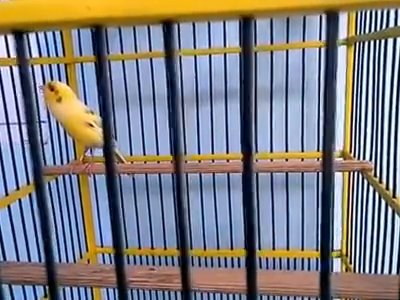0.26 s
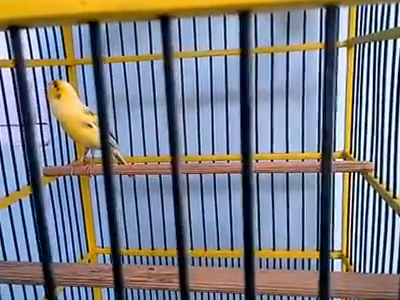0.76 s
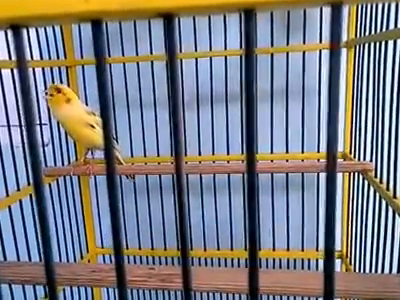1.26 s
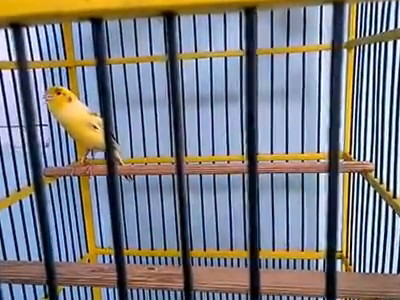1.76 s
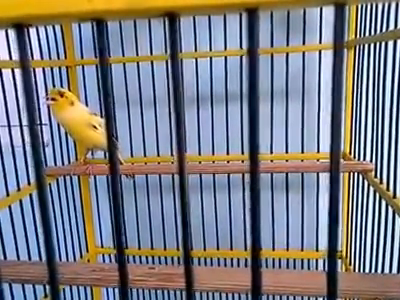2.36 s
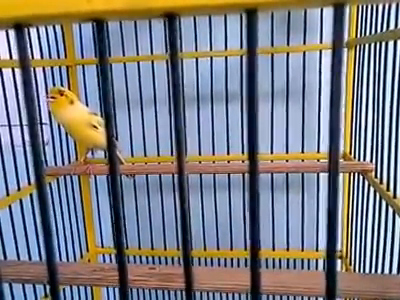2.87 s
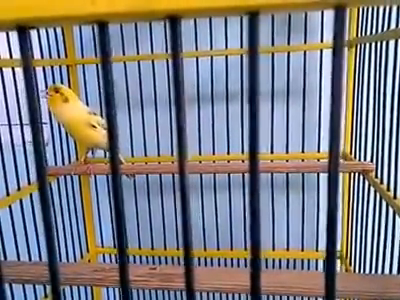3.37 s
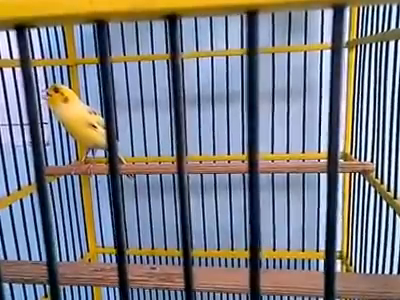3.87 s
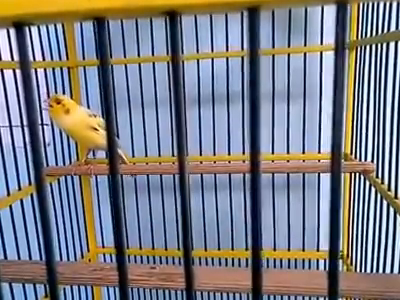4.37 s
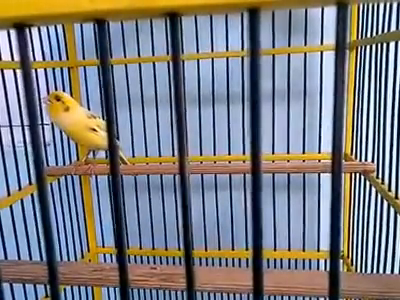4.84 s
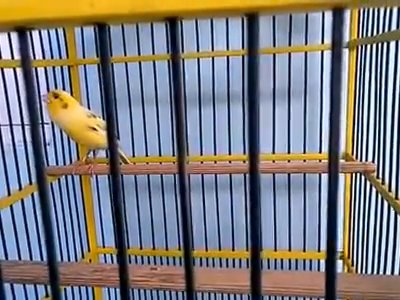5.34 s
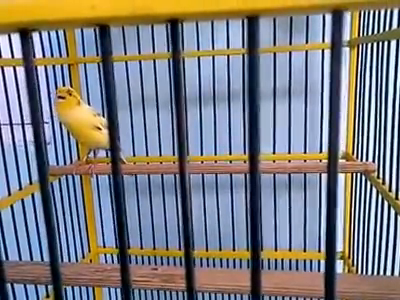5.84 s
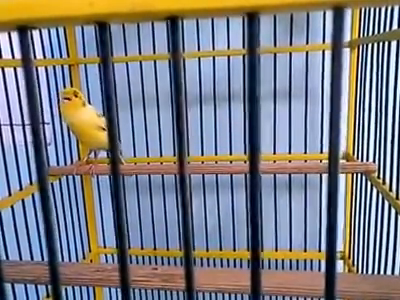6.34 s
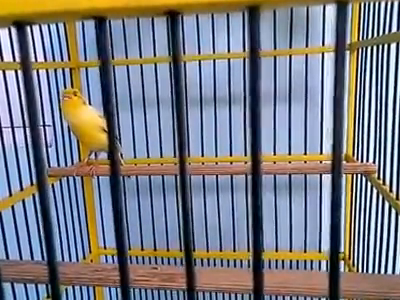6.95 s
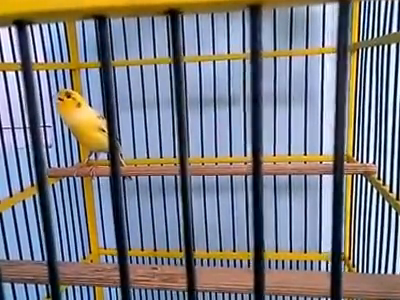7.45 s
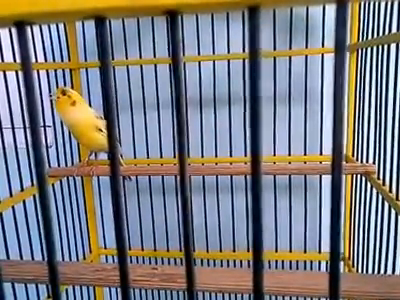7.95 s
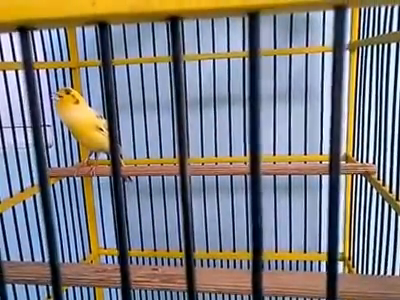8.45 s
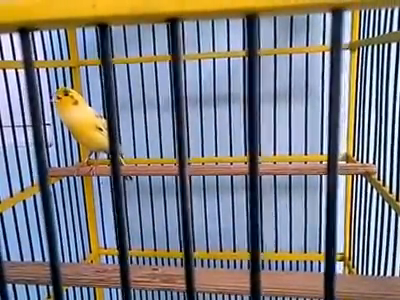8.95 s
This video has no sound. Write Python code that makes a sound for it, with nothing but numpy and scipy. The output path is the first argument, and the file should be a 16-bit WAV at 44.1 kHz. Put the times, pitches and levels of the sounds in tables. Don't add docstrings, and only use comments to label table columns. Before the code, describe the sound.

Bright, piercing canary song in rapid changing phrases rings off a nearby wall, with a fainter second bird and soft street wash behind.

```python
import sys
import numpy as np
from scipy import signal
from scipy.fft import rfft, irfft, next_fast_len
from scipy.io import wavfile
from scipy.ndimage import uniform_filter1d, minimum_filter1d

SR = 44100
rng = np.random.default_rng(int(sys.argv[2]) if len(sys.argv) > 2 else 0)


def unload_audio(sound):
    columns = np.transpose(np.atleast_2d(sound))
    steps = np.round(np.clip(columns, -1, 1) * 32767)
    wavfile.write(sys.argv[1], SR, steps.astype(np.int16))


def to_linear_factor(level_db):
    exponent = np.asarray(level_db, float) / 20
    return 10 ** exponent


N = 406161
LEAD = SR // 4
BEAK_HZ = 5000

# frequency in Hz, density in dB per Hz.
WASH_COLOUR = [(71, -33.5), (120, -7.5), (204, -15), (289, -8.5), (515, -12.5), (1160, -15.5), (1900, -12),
               (2470, -14), (3600, -9.5), (5300, -33), (8000, -38.5)]
# centre in seconds, width in
# seconds, flatness of the top, lift of the wash in dB, lift of the rumble in dB.
GUSTS = [
    (-.05, 0.3, 1.13, 7, -1.5),
    (2.951, 0.44, 0.35, -1.5, 5),
    (4.02, 0.37, 5.6, 7, -12.5),
    (6.08, 0.11, 2.6, -0.5, -2),
    (6.416, 0.019, 0.39, 12.5, 5.5),
    (9, 0.076, 0.83, 8.5, 12),
    (9.08, 0.2, 1.7, 8.5, -1),
]
# start in seconds, length in seconds, from Hz, to Hz, level in dB.
HOOTS = [
    (4.47, 0.039, 459, 482, -48.5),
    (4.6, 0.091, 478, 455, -49.5),
    (4.66, 0.08, 699, 711, -50.5),
    (4.73, 0.056, 1058, 1044, -47.5),
    (4.79, 0.14, 1722, 1610, -45),
    (6.7, 0.44, 1650, 1420, -52.5),
    (6.98, 0.24, 764, 656, -54),
    (7.3, 0.061, 514, 533, -50),
    (7.5, 0.065, 473, 523, -46.5),
    (7.76, 0.09, 314, 315, -49),
]
# start in seconds, length in seconds, level in dB.
FAR_UPSWEEPS = [(1.678, 0.051, -38.5), (1.839, 0.035, -42), (1.952, 0.047, -42), (2.084, 0.045, -44),
                (2.159, 0.047, -39), (2.336, 0.041, -40), (2.433, 0.025, -38), (2.579, 0.1, -42),
                (2.703, 0.022, -34), (2.946, 0.024, -35), (3.036, 0.021, -36.5), (3.14, 0.044, -38.5),
                (3.233, 0.056, -35.5), (3.561, 0.075, -38), (3.856, 0.11, -36)]
# start in seconds, length in seconds, level in dB.
FAR_DOWNSWEEPS = [
    (-.05, 0.087, -38.5),
    (4.35, 0.082, -32.5),
    (4.63, 0.091, -32),
    (4.936, .1, -30.5),
    (5.251, 0.11, -29.5),
    (7.839, 0.062, -29.5),
    (8.015, 0.056, -32),
    (8.616, 0.015, -25),
]
# start in seconds, length in
# seconds, from Hz, to Hz, level in dB.
FAR_HELD = [(0.13, 0.052, 3720, 3590, -23.5), (0.297, 0.033, 3610, 3590, -26.5),
            (0.45, 0.041, 3670, 3700, -25), (0.596, 0.065, 3605, 3650, -31.5),
            (0.74, 0.045, 6690, 5730, -27.5), (0.861, 0.033, 6890, 6100, -28.5),
            (4.416, 0.041, 2430, 2403, -39.5), (4.72, 0.07, 2163, 2200, -44),
            (5.03, 0.05, 2140, 2118, -41.5), (5.348, 0.038, 2147, 2170, -43.5),
            (2.12, 0.19, 3690, 3570, -37.5), (2.327, .11, 3490, 3670, -33.5),
            (3.307, 0.027, 3500, 4095, -30.5), (3.727, 0.11, 3825, 3860, -33.5),
            (3.739, 0.092, 5130, 5280, -13), (3.995, 0.13, 3720, 4230, -24.5),
            (2.264, 0.016, 4405, 3710, -38), (3.24, 0.036, 5180, 5100, -13), (4.574, 0.14, 7270, 6310, -30),
            (5.096, 0.4, 3380, 3184, -48.5), (5.46, 0.084, 5660, 5460, -28.5),
            (5.397, 0.091, 6840, 6620, -43.5), (5.463, 0.068, 5010, 4080, -31.5)]

# seconds from its anchor, pitch in Hz, level in dB.
ROLL = [(-.095, 7180, -28.5), (-.085, 6522, -3.5), (-.035, 4450, -5), (-.016, 3670, 0), (0, 3080, 0),
        (.012, 2650, -8), (.017, 2220, -0.5), (.0198, 2200, -2.5), (.025, 993, -32)]
# seconds from its anchor, pitch in Hz, level in dB.
LOW_ROLL = [(-.088, 6636, -10.5), (-.08, 6030, -11), (-.035, 4440, -4.5), (-.016, 3690, -1), (0, 3114, 0.3),
            (.012, 2520, -12), (.017, 2350, -11), (.0198, 2253, -2.5), (.025, 890, -35.5)]
# seconds from its anchor, pitch in Hz, level in dB.
SLIDE = [(-.21, 7384, -43), (-.13, 6964, -1.5), (-.085, 5976, 6.5), (-.05, 5030, -1.5), (-.03, 4400, 6),
         (-.014, 3680, 5), (0, 3000, 6), (.007, 2757, -4), (.012, 2610, -21.5)]
# seconds from its anchor, pitch in Hz, level in dB.
RISE = [(-.016, 1990, -40.5), (-.006, 2766, -1.5), (.004, 3125, 10.5), (.016, 3608, -26.5), (.03, 3710, 4),
        (.08, 4630, 3), (.12, 4900, -9), (.17, 5105, 6.5), (.22, 5330, -29.5)]
# seconds from its anchor, pitch in Hz, level in dB.
HOLD = [(-.11, 7113, -28.5), (-.085, 6500, -6.5), (-.055, 4650, -11), (-.02, 3857, -7), (0, 3528, -4.5),
        (.02, 3424, -7), (.068, 3360, -5.5), (.078, 3300, -13.5), (.09, 3490, -35.5)]
# seconds from its anchor, pitch in Hz, level in dB.
FALL = [(-.105, 7530, -37), (-.075, 6460, -1.5), (-.055, 4483, -17), (-.008, 3606, -5), (0.024, 3377, -6.5),
        (.06, 3050, -7), (.1, 2680, -15), (.14, 2300, -25), (.2, 2270, -27)]
# seconds from its anchor, pitch in Hz, level in dB.
TRILL = [(-.055, 6684, -5.5), (-.045, 5800, -7.5), (-.03, 4700, -3), (-.013, 3717, -9), (-.006, 3395, -1),
         (0, 2914, -5), (.004, 2600, -1.5), (.008, 1796, -17.5), (.012, 1040, -31.5)]
# seconds from its anchor, pitch in Hz, level in dB.
CHIP = [(-.06, 6260, -12.5), (-.05, 6000, -21.5), (-.035, 4660, -18), (-.014, 3670, -10), (-.006, 3386, -1),
        (0, 2971, -6.5), (.004, 2580, -11.5), (.007, 2080, -21), (.011, 1380, -54)]

# anchor in seconds, effort in dB, stretch before the anchor, stretch after it,
# extra dB on the high part. The phrases below share these columns.
FIRST_ROLLS = [(-0.04, -8.5, 0.58, 0.56, 0.5), (0.115, -10, 1.03, 0.94, 2), (0.272, -9.5, 1, 0.82, 0.6),
               (0.422, -10, 0.97, 1, 0.7), (0.576, -10.5, 0.73, 0.71, 1.5), (0.711, -10, 0.87, 0.59, -1.2),
               (0.838, -9.5, 0.66, 0.52, 0.5), (0.956, -11.5, 0.51, 0.77, -0.5),
               (1.093, -10.5, 0.83, 0.59, 0.5), (1.221, -11, 0.75, 0.52, 3.5),
               (1.345, -10, 0.63, 0.56, 2.3), (1.473, -10.5, 0.76, 0.65, 1.2)]
# anchor in seconds, effort in dB, stretch before, stretch after, extra high dB.
SLIDES = [
    (1.606, -16.5, 0.71, 0.12, -2.5),
    (1.811, -14, 0.9, 0.28, -0.7),
    (2.033, -14, 0.85, 0.65, -1.9),
    (2.28, -13.5, 0.9, 0.5, 0.6),
    (2.537, -14.5, 1.01, 0.42, -1.4),
    (2.795, -14, 1.03, 0.29, -2),
    (5.647, -14.5, 0.55, 0.5, -2.5),
]
# anchor in seconds, effort in dB, stretch before, stretch after, extra high dB.
RISES = [
    (2.844, -21.5, 1, 0.77, 1),
    (3.067, -17.5, 0.86, 0.91, -2.1),
    (3.346, -17, 0.65, .93, -0.8),
    (3.611, -16.5, 1, .89, -3),
]
# anchor in seconds, effort in dB, stretch before, stretch after, extra high dB.
HOLDS = [
    (3.993, -3.5, 0.98, 0.71, 0.5),
    (4.236, 0.5, .94, 1.03, -2),
    (4.494, -1, 0.97, 1.01, 0.3),
    (4.76, -0.5, 1.1, 1.68, -1.5),
    (5.055, -0.5, 1.05, 0.64, -4),
]
# anchor in seconds, effort in dB, stretch before, stretch after, extra high dB.
LAST_HOLD = [
    (5.303, -2, 1.04, 1, -1),
]
# anchor in seconds, effort in dB, stretch before, stretch after, extra high dB.
TRILLS = [
    (5.747, -12, 0.81, 1.3, -2.2),
    (5.842, -10.5, 0.95, 1, -1.5),
    (5.941, -8.5, 0.95, 0.78, 0.5),
    (6.036, -9.5, 0.93, 1.1, -1.5),
    (6.133, -7.5, 0.83, 0.84, -1.7),
    (6.225, -8, 0.97, 1, -0.1),
    (6.32, -8, 0.95, 0.62, -2.5),
    (6.416, -10, 1.29, 0.87, -0.5),
    (6.507, -7, 0.8, 0.97, -2.4),
    (6.603, -5.5, 0.44, 0.49, -2.3),
]
# anchor in seconds, effort in dB, stretch before, stretch after, extra high dB.
CHIPS = [
    (6.696, -1, 0.51, 0.75, 6.5),
    (6.787, -1, 0.69, 0.83, 1.5),
    (6.879, -3, 0.73, 0.97, 3.3),
    (6.969, -0.5, 0.65, 0.5, -2),
    (7.057, -2, 0.53, 0.77, 1),
    (7.144, -2.5, 0.63, 0.91, 3.2),
    (7.237, -2, 0.93, 0.41, -6.5),
    (7.327, -1.5, 0.82, 0.37, 2.8),
    (7.414, -1, 0.65, 0.34, 2),
    (7.505, -2, 0.8, 0.44, 1),
]
# anchor in seconds, effort in dB, stretch before, stretch after, extra high dB.
LAST_ROLLS = [(7.633, -7, 1.02, 0.98, -1.3), (7.785, -6.5, 1.03, 0.96, 0.6), (7.94, -6.5, 0.85, 1.04, -0.7),
              (8.094, -6.5, 1.15, 0.91, -0.1), (8.254, -7, 1.11, 1.0, 0.7), (8.409, -5.5, 1.1, 1.0, -1.1),
              (8.571, -6, 1.14, 0.98, -1.3), (8.728, -6, 1.03, 1, 0.3), (8.883, -8, 1.1, 1.01, -2.7),
              (9.035, -6, 0.95, 0.77, -2.4), (9.171, -7.5, 0.86, 0.55, -2.5)]
# time in seconds, extra dB on the highest notes.
BEAK = [(0, -6), (.6, 0), (1, 0.5), (1.5, 1.5), (2, -3.5), (2.5, 0.2), (3.1, 4), (3.6, 19), (4, 0.5),
        (4.6, -3.5), (5.3, -3.5), (5.65, 1), (6.3, 4.5), (7, 9), (7.6, 3.5), (8, 1), (8.4, 4.5),
        (9.2, 12.5)]

# delay in seconds, share of the direct sound.
WALLS = [(.0031, -0.16), (.0072, -0.26)]
# frequency in Hz, early decay time in seconds, level in dB.
ROOM = [(1500, .12, -2.5), (2200, 0.14, 0), (2880, 0.16, 4), (3500, 0.11, 1.1), (4500, 0.18, -4),
        (4950, 0.13, -4), (5360, 0.081, -2.5), (7000, .09, -8.5)]

# time in seconds, overshoot in dB.
OVERLOADS = [
    (2.4946, 0.5),
    (2.7782, 1.1),
    (4.2373, 1),
    (4.4938, 0.65),
    (6.4189, 1),
    (6.6053, 0.16),
    (6.7874, 1.9),
    (7.3244, -0.5),
    (7.6195, 0.36),
    (7.9373, 0.5),
]
BAND_EDGES_HZ = [3750, 4000, 4250, 4500, 4875, 5250, 5625, 6000, 6500, 7000, 7500]
BAND_DB = [-0.5, 1.5, 1, 0.43, -6.5, -6.5, -3, -9.5, -15.5, -5.5]
EARLY_TILES = [0.026, 0.086, 0.134, 0.178, 0.238, 0.354, 0.39, 0.482, 0.534, 0.594, 0.634, 0.686, 0.734,
               0.786, 0.862, 0.914, 0.966, 1.01, 1.058, 1.098, 1.138, 1.274, 1.326, 1.394, 1.49, 1.53,
               1.582, 1.682, 1.77, 1.79, 1.87, 2.122, 2.194, 2.262, 2.326, 2.386, 2.49, 2.634, 2.706, 2.858,
               2.91, 2.97, 3.03, 3.158, 3.234, 3.286, 3.334, 3.478, 3.542, 3.618, 3.654, 3.734, 3.798,
               3.862, 3.906, 3.942, 3.994]
LATE_TILES = [4.114, 4.166, 4.198, 4.29, 4.414, 4.43, 4.462, 4.51, 4.554, 4.65, 4.682, 4.718, 4.766, 4.886,
              4.97, 5.002, 5.038, 5.07, 5.142, 5.282, 5.318, 5.398, 5.458, 5.602, 5.702, 5.794, 5.89, 5.926,
              6.17, 6.242, 6.342, 6.958, 6.986, 7.062, 7.126, 7.186, 7.306, 7.522, 7.606, 7.758, 7.838,
              8.006, 8.062, 8.162, 8.214, 8.27, 8.314, 8.474, 8.542, 8.658, 8.694, 8.786, 8.854, 8.902,
              8.946, 8.998, 9.038]
EARLY_WIDE = [0.002, 0.286, 0.302, 0.338, 0.426, 1.19, 1.234, 1.366, 1.442, 1.63, 1.822, 1.938, 2.03, 2.078,
              2.45, 2.51, 2.542, 2.586, 2.762, 2.782, 2.81, 3.09, 3.378, 3.602, 3.89, 4.146, 4.246, 4.358,
              4.386, 4.666, 4.81, 4.954, 5.202, 5.218, 5.254, 5.522, 5.586, 5.638, 5.67]
LATE_WIDE = [5.75, 5.85, 5.954, 5.986, 6.042, 6.074, 6.09, 6.126, 6.214, 6.29, 6.43, 6.45, 6.466, 6.506,
             6.546, 6.59, 6.606, 6.654, 6.706, 6.746, 6.794, 6.834, 6.894, 6.938, 7.422, 7.458, 7.586,
             7.654, 7.698, 7.738, 7.79, 7.886, 7.958, 8.114, 8.134, 8.362, 8.43, 8.59, 8.642, 8.742, 9.082,
             9.134, 9.186]


def evened(x):
    return x / np.sqrt(np.mean(x ** 2) + 1e-20)


def gusts():
    t = np.arange(0, N, 64) / SR
    lift = 0
    for s, width, flatness, *db in GUSTS:
        swell = np.exp(-abs((t - s) / width) ** (2 * flatness))
        lift = lift + np.outer(db, swell)
    return np.repeat(lift, 64, axis=1)[:, :N]


def rumble():
    band = signal.butter(2, [45, 160], "band", fs=SR, output="sos")
    lumps = evened(uniform_filter1d(rng.standard_normal(N), size=3000))
    air = evened(signal.sosfilt(band, rng.standard_normal(N)) * to_linear_factor(4 * lumps))
    return to_linear_factor(-62 + gusts()[1]) * air


def street():
    hz, db = np.transpose(WASH_COLOUR)
    log_hz = np.log(np.fft.rfftfreq(N, 1 / SR) + 1)
    colour = to_linear_factor(np.interp(log_hz, np.log(hz), db))
    wash = evened(irfft(rfft(rng.standard_normal(N)) * colour, N))
    return to_linear_factor(-49 + gusts()[0]) * wash


def hum():
    t = np.arange(N) / SR
    waver = 1 + 0.26 * evened(uniform_filter1d(rng.standard_normal(N), size=4000))
    return to_linear_factor(-65) * waver * np.sin(2 * np.pi * 787 * t)


def add(mix, s, sound):
    part = mix[round(s * SR) + LEAD:][:len(sound)]
    part += sound[:len(part)]


def whistle(s, hz, db):
    t = np.arange(s[0], s[-1], 1 / SR)
    slow_noise = uniform_filter1d(uniform_filter1d(rng.standard_normal(9000), size=100), size=100)
    shake = np.resize(evened(slow_noise), len(t))
    pitch = uniform_filter1d(np.interp(t, s, hz), size=50) * (1 + shake / 300)
    phase = 2 * np.pi * np.cumsum(pitch) / SR
    overtone = to_linear_factor(-17 - 12 * np.clip(pitch / 500 - 6, 0, 3))
    fade = signal.windows.tukey(len(t), .02)
    return to_linear_factor(np.interp(t, s, db)) * fade * (np.sin(phase) + overtone * np.sin(2 * phase))


def glides(rows):
    out = np.zeros(N + LEAD)
    for s, length, start_hz, end_hz, db in rows:
        times = s + length * np.array([0, .3, .7, 1])
        pitch = np.geomspace(start_hz, end_hz, num=4)
        add(out, s, whistle(times, pitch, db + np.array([-9.0, 0, -1.5, -9.0])))
    return out


def distant_hoots():
    return glides(HOOTS)


def far_bird():
    ups = [(s, length, 1990, 3730, db) for s, length, db in FAR_UPSWEEPS]
    downs = [(s, length, 3380, 2196, db) for s, length, db in FAR_DOWNSWEEPS]
    return glides(ups + downs + FAR_HELD)


def canary():
    out = np.zeros(N + LEAD)
    phrases = [(ROLL, FIRST_ROLLS), (LOW_ROLL, LAST_ROLLS), (SLIDE, SLIDES), (RISE, RISES),
               (HOLD, HOLDS), (FALL, LAST_HOLD), (TRILL, TRILLS), (CHIP, CHIPS)]
    for shape, rows in phrases:
        s, hz, db = np.transpose(shape)
        for at, effort_db, before, after, high_db in rows:
            times = at + s * np.where(s < 0, before, after)
            beak_db = np.interp(at, *np.transpose(BEAK)) * (hz > BEAK_HZ)
            level = db + effort_db + beak_db + high_db * (hz > BAND_EDGES_HZ[0] + 100)
            add(out, times[0], whistle(times, hz, level))
    return out


def wall_bounces(x):
    n = np.arange(N + LEAD)
    nearest = (.00108, .7)
    return sum(share * np.interp(n - s * SR, n, x) for s, share in [nearest] + WALLS)


def room(x):
    hz, t, z = signal.stft(rng.standard_normal(SR * 3 // 4), SR, nperseg=256)
    at_hz, t60, db = np.transpose(ROOM)
    early = to_linear_factor(-60 * t / np.interp(hz, at_hz, t60)[:, None])
    late = to_linear_factor(-2.5 - 60 * t / 0.65) * (hz < 5000)[:, None]
    colour = to_linear_factor(np.interp(hz, at_hz, db))[:, None]
    tail = signal.istft(z * (early + late) * colour, SR, nperseg=256)[1]
    return signal.fftconvolve(x, tail / 70)[:len(x)]


def scene():
    bird, far, hoots = canary(), far_bird(), distant_hoots()
    reverb = room(to_linear_factor(-8) * bird + to_linear_factor(6) * far)
    voices = bird + wall_bounces(bird) + far + hoots + reverb
    return (voices[LEAD:] + street() + hum() + rumble())[None]


def tiles():
    starts = np.sort(EARLY_TILES + LATE_TILES + EARLY_WIDE + LATE_WIDE)
    return starts, np.isin(starts, EARLY_WIDE + LATE_WIDE)


def starve(x):
    hz, t, z = signal.stft(x, SR, nperseg=512, noverlap=384)
    power = uniform_filter1d(abs(z) ** 2, size=30, axis=1)
    quiet = power < to_linear_factor(2 * -31) * power[8:].max(0)
    weak = quiet & ((hz > 900) & (hz < 2300))[:, None]
    patches = np.kron(rng.random((len(t) // 12 + 1, 86)), np.ones((12, 3)))
    luck = patches[:len(t), :len(hz)].T
    holes = weak & (luck < .2)
    return signal.istft(z * to_linear_factor(-22 * holes), SR, nperseg=512, noverlap=384)[1][:N]


def rebuild_top(x):
    spread, blur = 0.1, 0.16
    flatten, noise_share = 0.028, 0.36
    size = next_fast_len(N)
    high_pass = signal.butter(16, BAND_EDGES_HZ[0], "high", fs=SR, output="sos")
    low = x - signal.sosfiltfilt(high_pass, x)
    shift = np.exp(2j * np.pi * 3250 * np.arange(N) / SR)
    moved = 2 * (signal.hilbert(low, size)[:N] * shift).real
    spectra = rfft(np.array([x, moved, rng.standard_normal(N)]), size)
    hz = np.fft.rfftfreq(size, 1 / SR)
    bands = [irfft(spectra * ((hz >= lo) & (hz < hi)), size)[:, :N]
             for lo, hi in zip(BAND_EDGES_HZ, BAND_EDGES_HZ[1:])]

    starts, wide = tiles()
    first = np.r_[0, np.round(starts[1:] * SR).astype(int)]
    want = np.array([np.add.reduceat(b[0] ** 2, first) for b in bands])
    widths = np.diff(BAND_EDGES_HZ)[:4, None]
    joined = np.where(wide, 1, spread)
    want[:4] += joined * (want[:4].sum(0) * widths / widths.sum() - want[:4])
    want[5:9] += blur * (uniform_filter1d(want[5:9], size=3, axis=0) - want[5:9])

    top = 0
    for (_, copy, noise), energy, db in zip(bands, want, BAND_DB):
        envelope = abs(uniform_filter1d(copy ** 2, size=200)) + 1e-12
        copy = copy / envelope ** (flatten / 2)
        have = np.add.reduceat(np.array([copy, noise]) ** 2, first, axis=1) + 1e-18
        lift = np.minimum(np.sqrt((1 - noise_share) * energy / have[0]), to_linear_factor(-4))
        fill = np.sqrt((energy - lift ** 2 * have[0]) / have[1])
        gains = np.repeat(np.array([lift, fill]), np.diff(np.r_[first, N]), axis=1)
        gains = uniform_filter1d(gains, size=140)
        top = top + to_linear_factor(db) * (gains[0] * copy + gains[1] * noise)
    return starve(low) + top


def limiter(x):
    held = minimum_filter1d(np.minimum(1, .93 / (abs(x) + 1e-9)), size=131)
    return x * uniform_filter1d(held, size=65)


def overloads(x):
    gain = np.ones(N)
    for s, db in OVERLOADS:
        near = round(s * SR) - 60
        at = near + abs(x[near:near + 120]).argmax()
        gain[at - 60:at + 61] += (to_linear_factor(db) / abs(x[at]) - 1) * np.hanning(121)
    return gain


def band_limit(x):
    return signal.sosfilt(signal.butter(12, 7770, fs=SR, output="sos"), x)


def record(dry):
    limited = limiter(rebuild_top(dry[0]))
    mix = limited * overloads(limited) + .0052
    return band_limit(mix[None])


dry = scene()
out = record(dry)
unload_audio(out)
```